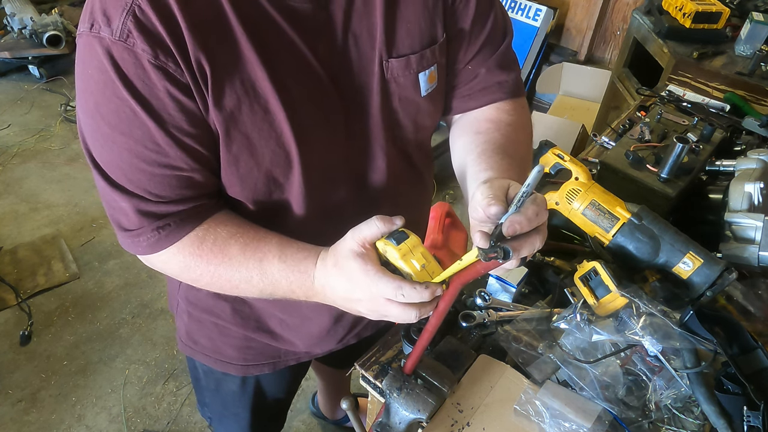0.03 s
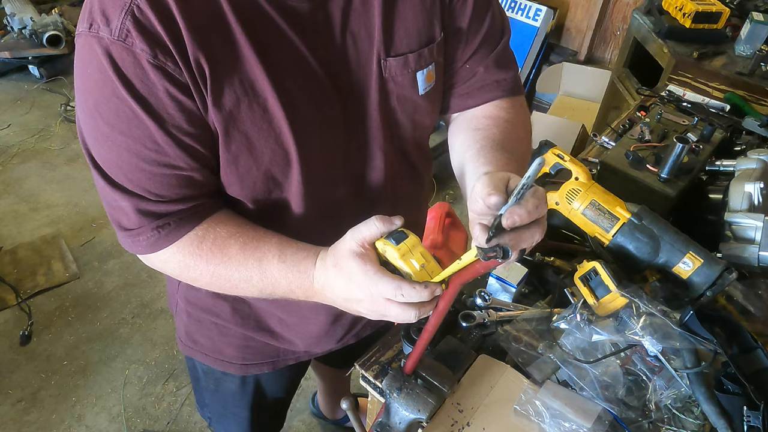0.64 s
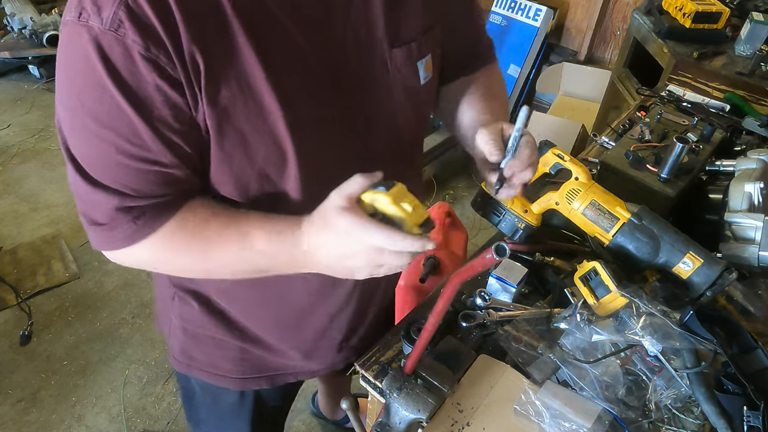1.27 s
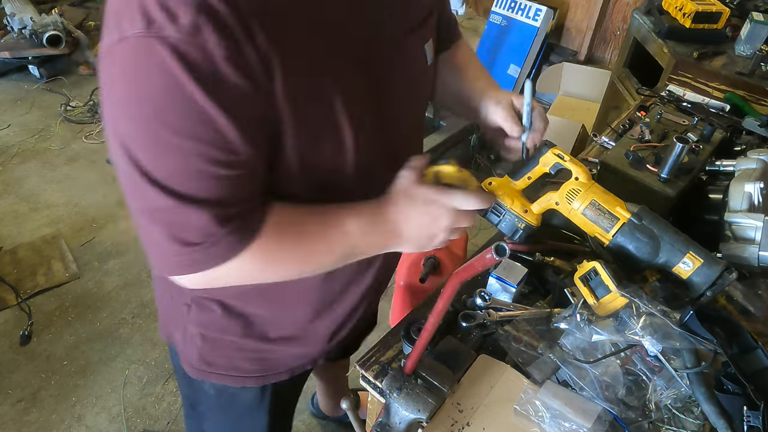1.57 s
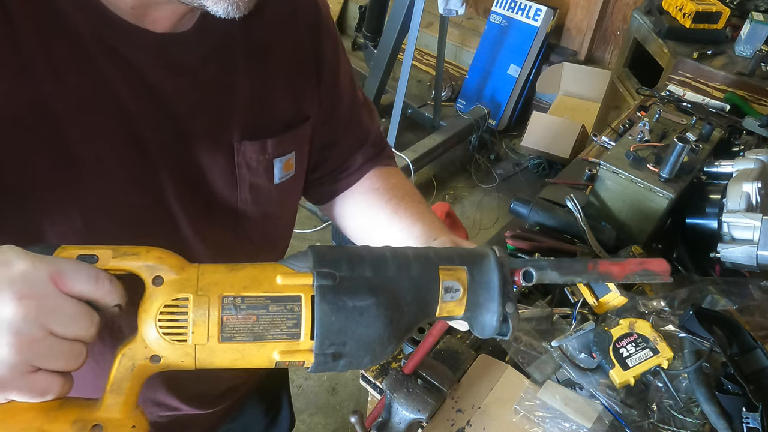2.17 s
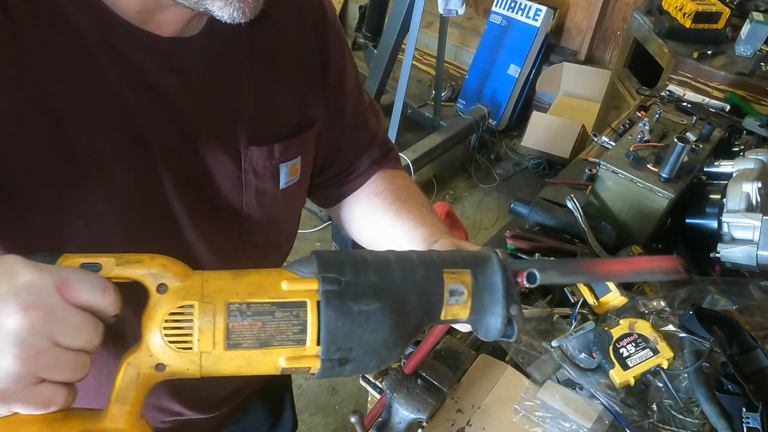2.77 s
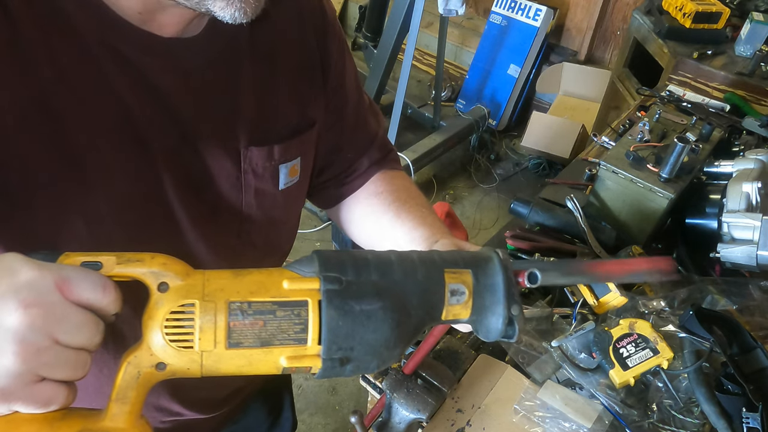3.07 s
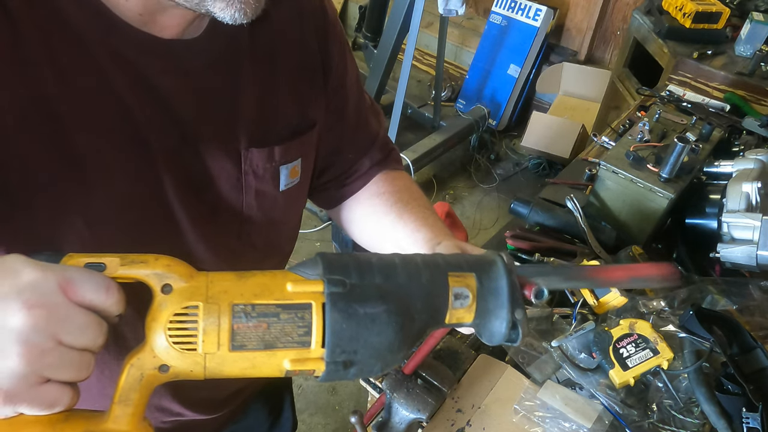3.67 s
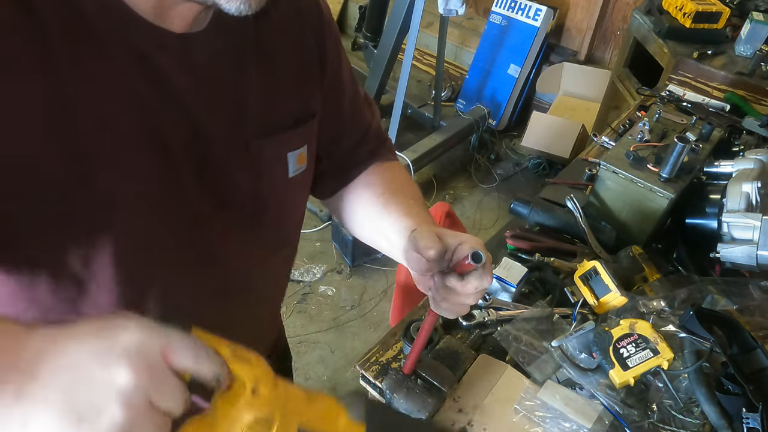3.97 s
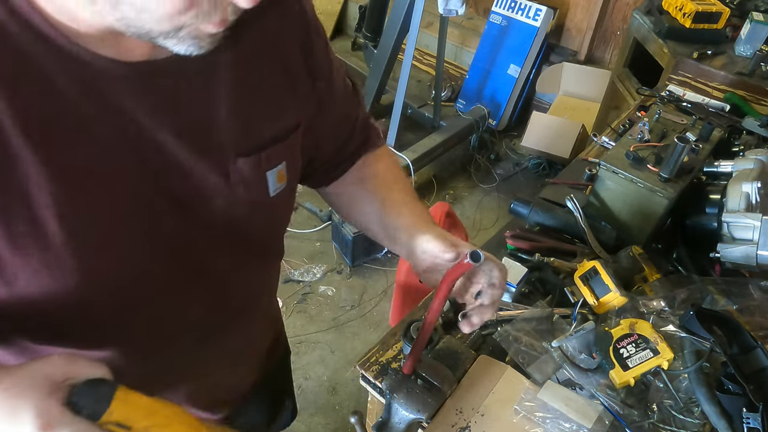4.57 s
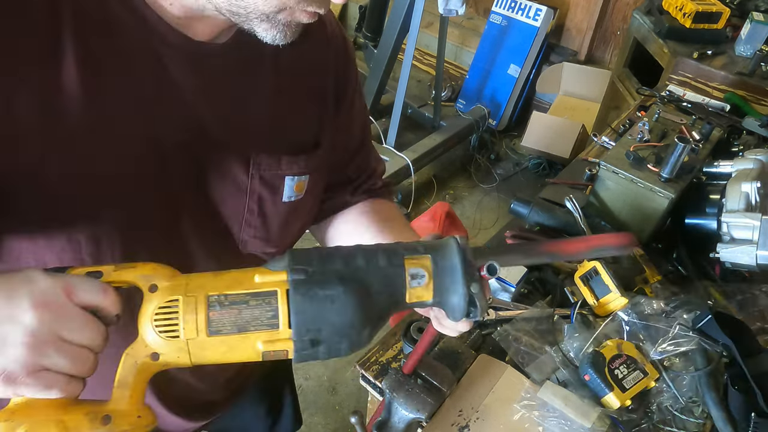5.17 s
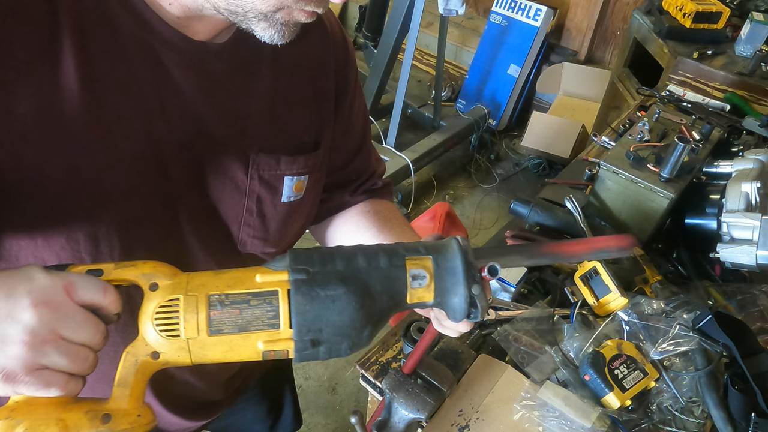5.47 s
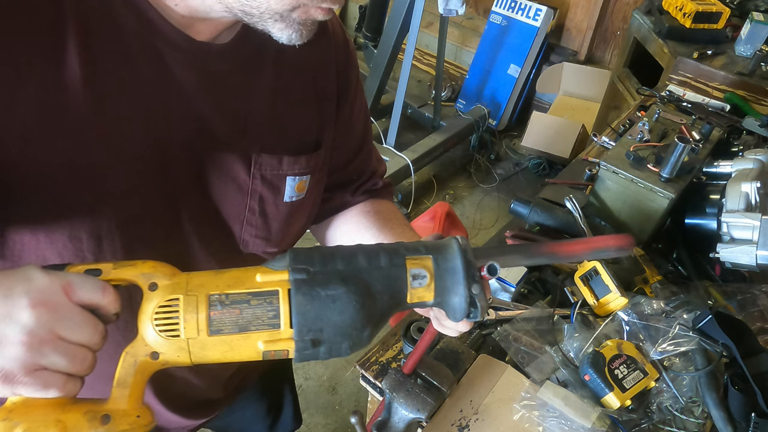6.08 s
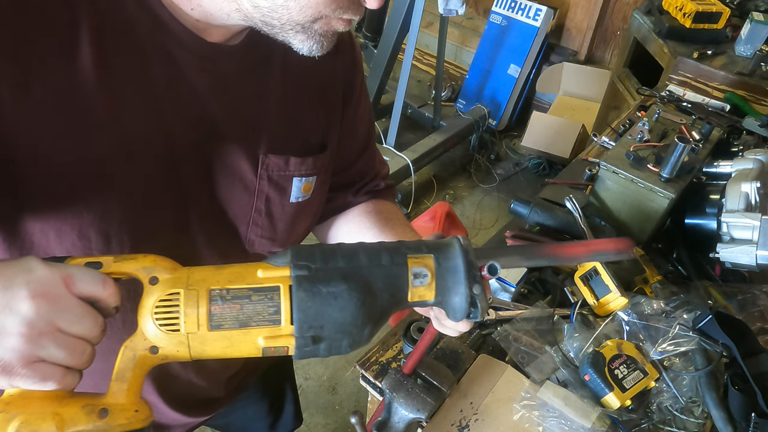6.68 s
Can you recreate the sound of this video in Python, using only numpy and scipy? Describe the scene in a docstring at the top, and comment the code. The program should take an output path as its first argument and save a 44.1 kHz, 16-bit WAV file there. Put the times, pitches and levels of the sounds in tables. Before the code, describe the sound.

A faint low rumble fills a small workshop, with a few light handling ticks. At about 1.2 seconds a steel tape measure zips and chatters into its case, ending in a sharp snap. Dull knocks on a bench follow around 1.7 seconds. At 2.4 seconds a reciprocating saw bites into a steel tube with a tiny squeak and speeds up into a loud, fast, rattling rasp, with a bright hiss, a gear whine and a low shaking hum. Near 4 seconds the blade breaks through and the saw quickly dies away. The tube thuds in the vise, and the offcut clinks and bounces from 4.3 to 4.5 seconds, leaving faint ticks. At about 5.1 seconds a second cut begins abruptly at full speed and runs steadily until the end, near 7 seconds. Everything sounds close, with a short room echo.

```python
"""A tape measure zips shut and is put down on a bench; a reciprocating saw then cuts a steel tube
held in a vise. Each stroke shakes the saw, rattles its drive and drags the teeth over the steel,
while the bevel gear whines. The blade breaks through, the saw dies away and the offcut clinks down.
The scene then jumps into the middle of a second cut. All of it sounds in a small workshop."""
import sys
import numpy as np
from scipy import signal
from scipy.fft import rfft, irfft, next_fast_len
from scipy.io import wavfile
from scipy.ndimage import uniform_filter1d

SR = 44100
rng = np.random.default_rng(int(sys.argv[2]) if len(sys.argv) > 2 else 0)


def transcribe(u):
    """Save the signal u as a 16-bit wav file named by the first command-line argument.

    u: samples, shape (n,) or (channels, n), limited to [-1, 1]; the rate is SR.
    q: integer samples, one column per channel.
    """
    v = np.clip(np.atleast_2d(u).T, -1, 1)
    q = np.round(v * 32767).astype(np.int16)
    wavfile.write(sys.argv[1], SR, q)


N = 305277
T = np.arange(N) / SR
TRIGGER_S, THROUGH_S, JUMP_S = 2.422, 3.959, 5.143  # saw starts, blade breaks through, second cut
FIRST_CUT = T < JUMP_S


def undb(db):
    """Decibels to gain."""
    return np.exp(np.asarray(db) * (np.log(10) / 20))


def unit(x):
    """Scale to rms 1."""
    return x / np.sqrt(np.mean(x ** 2))


def decay(age, t60):
    """Gain that falls 60 dB every t60 seconds."""
    return np.exp(-np.log(1000) * age / t60)


def since(s):
    """Seconds gone by since a moment of the first cut; zero before it and in the second cut."""
    return np.maximum(T - s, 0) * FIRST_CUT


def swell(s, hold, db, rise, fall):
    """Gain that climbs 60 dB per `rise` seconds to its level at s, holds, and drops 60 dB per `fall`."""
    away = np.maximum(s - T, 0) / rise + np.maximum(T - s - hold, 0) / fall
    return undb(db - 60 * np.minimum(away, 3))


def walk(rate):
    """Smooth random drift with about `rate` new values a second; spread near 1."""
    hold = max(int(SR / rate), 32)
    steps = np.repeat(rng.standard_normal(N // 32 + 1)[:N // hold + 1], hold)
    return np.sqrt(2) * uniform_filter1d(uniform_filter1d(steps, hold), hold)[:N]


def across(points, freq):
    """Read (Hz, value) points on a log-frequency axis."""
    hz, value = np.transpose(sorted(map(tuple, points)))
    return np.interp(np.log(np.maximum(freq, 1)), np.log(hz), value)


def body(colour, peaks=(), size=8192):
    """Impulse response of unit energy: a broad colour lifted by resonances."""
    freq = np.arange(size // 2 + 1) * SR / size
    lift_db = sum(lift / (1 + (2 * (freq - hz) / width) ** 2) for hz, width, lift in peaks)
    cepstrum = irfft(np.log(undb(across(colour, freq) + lift_db)))
    cepstrum[1:size // 2] *= 2  # minimum phase keeps attacks sharp
    cepstrum[size // 2 + 1:] = 0
    response = irfft(np.exp(rfft(cepstrum)))
    return response / np.linalg.norm(response)


def ring(force, response):
    """Pass a force through an impulse response."""
    return signal.oaconvolve(force, response)[:N]


def burst(s, db, t60):
    """A blow: a flurry of tiny contacts that dies away."""
    age = np.arange(SR // 3) / SR
    force = undb(db) * rng.standard_normal(len(age)) * decay(age, t60)
    return np.pad(force, (int(s * SR), N))[:N]


def struck(force, colour, modes, ring_db):
    """A struck object: its broad clack and its ringing modes."""
    age = np.arange(SR // 2) / SR
    tones = sum(undb(db) * np.sin(2 * np.pi * hz * age) * decay(age, t60) for hz, db, t60 in modes)
    return ring(force, body(colour)) + undb(ring_db) * ring(force, tones / np.linalg.norm(tones))


def air(start_db=-49, fade_db_per_s=2.5):
    """Low rumble and a faint rush fill the workshop and slowly grow quieter."""
    # room tone: freq_hz, gain_db
    colour = [(15, -35), (25, -5), (101, -4), (257, -24.5), (278, -28.5), (318, -24.5), (373, -35.5),
              (450, -28.5), (501, -35.5), (543, -30), (811, -37.5), (1030, -24.5), (1580, -31), (2020, -48),
              (15000, -73.5)]
    rush = ring(rng.standard_normal(N), body(colour))
    return rush * undb(start_db - fade_db_per_s * T + walk(5.9))


def tape_measure():
    """The steel tape scrapes into its case, chatters and snaps against the stop."""
    # the tape creeps in, runs home, then the case is pushed: start_s, hold_s, level_db, rise_s, fall_s
    slides = [(1.036, 0.03, -51, .3, 0.39), (1.19, .08, -39.5, 0.14, .1), (1.565, 0.022, -48, 0.1, 0.36)]
    # handling ticks, and the tape slapping the mouth of its case: start_s, level_db
    clicks = [(.089, -51.5), (.759, -60), (.851, -60.5), (.885, -54), (1.139, -40.5), (1.185, -24.5),
              (1.198, -26), (1.223, -30), (1.241, -32.5), (1.31, -26.5), (1.572, -36.5), (1.868, -55),
              (1.989, -55), (2.006, -52), (2.123, -58), (2.205, -59.5)]
    # bright zip of the tape: freq_hz, gain_db
    slide_colour = [(400, -25.5), (800, -10.5), (1100, 7.5), (2000, 7.5), (3500, 3.5), (6000, 1),
                    (8000, -0.5), (11000, -15), (15000, -22.5)]
    # the hook hitting its stop: start_s, level_db, t60_s
    snaps = [(1.2722, -20, 0.022), (1.277, -11.5, 0.034)]
    # clack of the case: freq_hz, gain_db
    case_colour = [(59, -43.5), (100, -13), (134, -21), (310, -7), (703, -20), (962, -10.5), (1590, -4.5),
                   (1700, -5), (1880, 1.5), (2320, -10), (3680, -2.5), (5840, -13.5), (7670, -13.5),
                   (11900, -24.5), (15000, -48.5)]
    # ring of the case: pitch_hz, gain_db, t60_s
    case_modes = [(1206, -9, .35), (1850, -3.5, 0.57), (2067, -5, .29), (2616, -7, .1), (3940, -17, 0.054),
                  (6360, -12, .15), (7550, -3.5, 0.181)]
    scrape = sum(swell(*row) for row in slides) * undb(2 * walk(150)) * rng.standard_normal(N)
    ticks = sum(burst(s, db, t60=0.023) for s, db in clicks)
    snap = struck(sum(burst(*row) for row in snaps), case_colour, case_modes, ring_db=-20.5)
    return ring(scrape + ticks, body(slide_colour)) + snap


def sleeve():
    """A sleeve brushes softly as the arm reaches across the bench."""
    # arm movements: start_s, hold_s, level_db
    reaches = [(0.876, 1.3, -77), (2.358, .1, -70.5), (4.6, 0.56, -72)]
    # swish of cloth: freq_hz, gain_db
    colour = [(800, -4.5), (2500, 0), (5000, 1.5), (8000, -2), (12000, -9), (15000, -22)]
    moving = sum(swell(*row, rise=0.4, fall=0.5) for row in reaches)
    return ring(moving * undb(2.5 * walk(170)) * rng.standard_normal(N), body(colour))


def vise():
    """The tube bumps against the jaws, faintly under the tape and hard once it is cut."""
    # bumps: start_s, level_db, t60_s
    bumps = [(0.884, -52, .1), (4.094, -13.5, 0.086), (4.205, -23.5, 0.077), (4.231, -20, 0.037),
             (4.274, -28, 0.076), (4.335, -29, 0.15), (4.42, -31.5, 0.25), (4.495, -30, 0.043),
             (4.529, -34.5, 0.075)]
    # hollow thud: freq_hz, gain_db
    colour = [(30, -17), (70, 3.5), (100, 3), (160, -1), (260, -8), (400, -5), (560, -1.5), (900, -4.5),
              (2000, -17), (4000, -29.5), (10000, -47)]
    return ring(sum(burst(*row) for row in bumps), body(colour))


def bench(sway_hz=39, sway_db=-28, sway_t60=0.74):
    """Tools knock on the bench, softer contacts sounding duller; the first blow sets the top swaying."""
    # tape and saw meeting the bench: start_s, level_db, t60_s, lowpass_hz
    knocks = [(1.640, -20.5, 0.093, 5000), (1.691, -23, 0.15, 2600), (1.716, -31, 0.13, 1400)]
    # thump of the top: freq_hz, gain_db
    colour = [(25, -12.5), (40, -23.5), (60, 9), (100, 8.5), (150, 2), (260, 2), (350, -3.5), (580, 3),
              (900, 3), (1300, 2.5), (2600, -2.5), (3200, -7), (8000, -19.5), (15000, -32)]
    # ring of the top: pitch_hz, gain_db, t60_s
    modes = [(103, -3, 0.4), (184, -12, 0.28), (263.4, -9.5, .25), (600, 0.5, 0.11), (766, -9, .12)]
    force = sum(signal.sosfilt(signal.butter(1, hz, fs=SR, output="sos"), burst(s, db, t60))
                for s, db, t60, hz in knocks)
    age = np.maximum(T - knocks[0][0], 0)
    sway = undb(sway_db) * np.sin(2 * np.pi * sway_hz * age) * decay(age, sway_t60)
    return struck(force, colour, modes, ring_db=-5.5) + sway


def squeak(waver=0.029):
    """The teeth squeal briefly as they slip into and out of the cut."""
    # gliding squeals: start_s, length_s, start_hz, end_hz, level_db
    squeaks = [(2.39, 0.024, 9100, 8680, -67), (2.411, .012, 6220, 4600, -44),
               (2.418, 0.055, 4710, 5100, -38), (3.956, .04, 8500, 8240, -36.5)]
    squeals, wobble = 0, 1 + waver * walk(900)
    for s, length, start_hz, end_hz, db in squeaks:
        hz = wobble * np.interp(T, [s, s + length], [start_hz, end_hz])
        tone = np.sqrt(2) * np.sin(2 * np.pi * np.cumsum(hz) / SR)
        squeals = squeals + tone * swell(s, length, db, rise=0.017, fall=0.03)
    return squeals


def tooth_pressure(angle):
    """The teeth bear down on both half strokes, harder on the pull, and ease off in between."""
    stroke = 1 + 0.14 * np.cos(angle) + 0.14 * np.cos(2 * angle) + 0.12 * np.cos(3 * angle)
    return unit(stroke * undb(0.8 * walk(220)))


def rattle(strokes, size=1024):
    """The loose parts of the drive chatter in the same order on every stroke."""
    pattern = irfft(np.exp(2j * np.pi * rng.random(size // 2 + 1)))
    return unit(np.interp(strokes % 1 * size, np.arange(size + 1), np.append(pattern, pattern[0])))


def rasp(force):
    """Teeth dragging over steel set housing, blade and tube ringing."""
    # broad grind of the cut: freq_hz, gain_db
    colour = [(150, -9), (450, -13), (700, -13), (950, 0), (1500, -3), (2300, -5), (3300, -7), (4300, -8.5),
              (6000, -18.5), (9000, -37)]
    # resonances of housing, blade and tube: centre_hz, width_hz, lift_db
    peaks = [(1111, 157, 10), (1856, 305, 9), (2220, 200, 7.5), (2445, 37, 4), (2843, 97, 5),
             (3080, 100, 5), (3460, 120, 8), (3640, 127, 8.5)]
    return unit(ring(force, body(colour, peaks)))


def hiss(pressure, chatter, graze_s=0.022, fade_db_per_s=205.5):
    """The bright edge of the cut; the teeth graze the steel a moment longer after breaking through."""
    # sizzle of the teeth: freq_hz, gain_db
    colour = [(2500, 2), (4700, 3), (6000, 3), (7200, 1.5), (7800, -2), (8400, 0.5), (9400, -5),
              (11000, -4), (13000, -12), (15500, -58.5)]
    sizzle = unit(ring(pressure * (rng.standard_normal(N) + 0.5 * chatter), body(colour)))
    return sizzle * undb(-31.5 - fade_db_per_s * since(THROUGH_S + graze_s))


def motor(angle):
    """Motor and fan give thin wavering whistles locked to the shaft."""
    # whistles: cycles_per_stroke, gain_db (against the rasp)
    whistles = [(72, -18.5), (92, -16), (121, -22.5), (182, -27), (212, -30), (254, -37)]
    return np.sqrt(2) * sum(undb(db + 2.5 * walk(50)) * np.sin(k * angle + k / 50 * walk(140))
                            for k, db in whistles)


def gear(angle, teeth=47, octave_db=-10):
    """The bevel gear's mesh tone; the crank loads and slows it once a stroke, making sidebands."""
    mesh = teeth * angle + 1.35 * np.sin(angle) + 0.15 * walk(60)
    throb = (1 + 0.7 * np.cos(angle + 1.1)) * undb(1.2 * walk(25))
    return unit(throb * (np.sin(mesh) + undb(octave_db) * np.sin(2 * mesh)))


def housing(angle, cycles_per_stroke=29):
    """The return stroke sets the gear housing buzzing, in turn with the gear's whine."""
    buzz = np.sin(cycles_per_stroke * angle + 0.93 * np.sin(angle) + 1.08 * walk(70))
    throb = 1 - 0.603 * np.cos(angle + 1.9)
    return unit(throb * buzz) * undb(1.2 * walk(40))


def tube(force, biting, load, slow_hz):
    """The tube's free end trembles under load and judders as the saw speeds up and breaks through."""
    # judders: start_s, hold_s, level_db, rise_s, fall_s
    judders = [(2.778, 0.098, -30.5, 1.8, 0.73), (3.995, .03, -22.5, 0.38, 0.42)]
    # low drone of the tube: freq_hz, gain_db
    colour = [(25, -17.5), (70, -3), (140, -5), (300, -12.5), (700, -15), (1200, -50), (3000, -99)]
    # bending resonances of the clamped tube: centre_hz, width_hz, lift_db
    peaks = [(94, 60, 14), (190.4, 46, 5), (244.5, 21.6, 13), (385, 140, 10), (544, 92, 7)]
    tremble = load * undb(-35.5 - 1.2 * slow_hz)
    judder = biting * sum(swell(*row) for row in judders)
    return (tremble + judder) * ring(unit(force), body(colour, peaks))


def crank(angle, slow_hz, sunk_s=3.12, steadying_db_per_s=12):
    """The crank shakes the saw at the stroke rate and knocks in overtones, both weaker at low speed."""
    # partials of the knock: cycles_per_stroke, gain_db
    overtones = [(2, 0.5), (3, -7.5), (4, -1), (5, 1), (6, -8.5), (7, -1.5), (8, -13.5), (9, -8),
                 (10, -4.5), (14, -19), (16, -20), (19, -14.5), (20, -6), (21, -8.5)]
    knock = unit(sum(undb(db + walk(5.4)) * np.sin(k * angle + 2 * np.pi * rng.random())
                     for k, db in overtones))
    knock *= undb(np.where(FIRST_CUT, -34.5, -29.5) - 1.5 * slow_hz)
    shake = np.sqrt(2) * np.sin(angle) * undb(-25.5 - 6 * slow_hz)
    steadied = undb(-steadying_db_per_s * since(sunk_s))  # the kerf grips the blade as it sinks in
    return steadied * (shake + knock)


def saw(second_cut_hz=38.55, bite_s=0.037, catch_s=0.01):
    """One crank drives every part of the saw; returns the cutting noise and the drive's whine and hum."""
    # the trigger is eased in, then squeezed fully, in the first cut: time_s, stroke_hz
    speed = [(2.42, 26.7), (2.784, 33.4), (2.89, 37.2), (3.0, 39.0), (3.3, 40.15), (3.86, 40.8),
             (4.0, 39.8)]
    # the teeth catch or skip for an instant: time_s, change_db
    catches = [(2.578, -0.5), (2.605, -9), (3.93, 2)]
    stroke_hz = np.where(FIRST_CUT, np.interp(T, *np.transpose(speed)), second_cut_hz + 0.08 * walk(3))
    slow_hz = np.maximum(36 - stroke_hz, 0)
    labour = np.clip((38 - stroke_hz) / 6, 0, 1)  # below full speed the motor labours and wavers
    strokes = np.cumsum(stroke_hz * (1 + 0.06 * labour * walk(45))) / SR + 0.0014 * walk(45)
    angle = 2 * np.pi * strokes
    # the load builds as the teeth bite; once they are through, the saw dies away, its whine fastest
    biting = np.where(FIRST_CUT, 1 - np.exp(-since(TRIGGER_S) / bite_s), 1)
    load = biting * undb(-129 * since(THROUGH_S))
    driven = undb(-294 * since(THROUGH_S))
    catch_db = sum(db * np.exp(-((T - s) / catch_s) ** 2) for s, db in catches)

    pressure = tooth_pressure(angle)
    chatter = rattle(strokes)
    grit = rng.standard_normal(N)
    grind = rasp(pressure * (chatter + grit))
    sizzle = np.sqrt(biting) * hiss(pressure, chatter)
    cutting = load * undb(-19.5 + catch_db) * (grind + driven * motor(angle))
    whine_gain = biting * driven * undb(np.where(FIRST_CUT, -27.5, -31.5) - 2.5 * labour)
    whine = whine_gain * (gear(angle) + undb(-6.5) * housing(angle))
    judder = tube(0.5 * chatter + grit, biting, load, slow_hz)
    hum = load * crank(angle, slow_hz)
    return cutting + sizzle + judder + squeak(), whine + hum


def offcut(settle_s=4.63, settle_length_s=0.16, settle_count=4):
    """The cut-off piece brushes the blade, drops and bounces; loose steel settles in faint ticks."""
    # the piece landing and bouncing: start_s, level_db, t60_s
    bounces = [(4.273, -15, 0.031), (4.33, -18, 0.038), (4.358, -14, 0.027), (4.384, -43, 0.091),
               (4.446, -35.5, .05), (4.505, -39, 0.036)]
    # clank of the piece: freq_hz, gain_db
    colour = [(120, -48), (200, -3), (292, -9), (326, -17), (397, 0), (435, -8), (476, -5), (721, -15.5),
              (1150, 0.5), (1380, -1.5), (1810, -1.5), (2800, -5.5), (3230, -3), (5550, -20), (15000, -68)]
    # ring of the piece: pitch_hz, gain_db, t60_s
    modes = [(900, 6, 0.39), (1060, 9.5, 0.36), (1350, 6, 0.26), (1900, -5, .15), (2220, -7, .16),
             (2444, -11, .4), (2697, -11, .27), (3176, -21, .4), (3989, 0, 0.24), (4215, -14, 0.288),
             (4619, -14, .15)]
    # light touches on the blade and loose steel: start_s, level_db, t60_s
    touches = [(4.205, -40.5, 0.042), (4.215, -35, 0.024), (4.245, -55, 0.018), (4.445, -53, 0.12),
               (4.479, -51.5, 0.16), (4.528, -55.5, 0.15), (4.59, -54, 0.079)]
    # thin tick of the blade: freq_hz, gain_db
    blade_colour = [(1000, -5), (3000, -1.5), (7000, -4.5), (9000, -1), (11000, -6), (15000, -30)]
    # ring of the blade: pitch_hz, gain_db, t60_s
    blade_modes = [(8900, 6, .25), (9100, -3, .3), (9750, -3, .25), (11300, -12, 0.23)]
    clinks = struck(sum(burst(*row) for row in bounces), colour, modes, ring_db=-14.5)
    slots = (np.arange(settle_count) + rng.random(settle_count)) / settle_count
    tinkles = sum(burst(*row) for row in touches)
    settling = sum(burst(s, db=-64, t60=0.032) for s in settle_s + settle_length_s * slots)
    return clinks + struck(tinkles + settling, blade_colour, blade_modes, ring_db=-18)


def room(send, build_s=0.0026, width=1.29):
    """The workshop's diffuse tail, different at each ear and shorter in the treble."""
    # reverb time: freq_hz, t60_s
    t60s = [(100, 0.5), (500, 0.5), (2000, 0.42), (5000, 0.28), (10000, 0.24), (16000, 0.2)]
    freq, age, cells = signal.stft(rng.standard_normal((2, SR * 3 // 4)), SR, nperseg=256)
    tails = signal.istft(cells * decay(age, across(t60s, freq)[:, None]), SR)[1]
    tails *= 1 - np.exp(-np.arange(tails.shape[1]) / SR / build_s)
    mid, side = (ring(send, tail / np.linalg.norm(tail)) for tail in tails)
    # long waves reach both sides alike
    side = signal.sosfilt(signal.butter(1, 2500, "high", fs=SR, output="sos"), side)
    return mid + width * np.array([side, -side])


def scene():
    """Every source is heard directly; all but the saw's drive also feed the workshop's tail."""
    cutting, drive = saw()
    # sound, send_db
    sources = [(cutting, -11), (tape_measure(), -10), (bench(), -7), (vise(), -10),
               (offcut(), -5), (sleeve(), -8), (air(), -8)]
    direct = drive + sum(sound for sound, _ in sources)
    return direct + room(sum(undb(db) * sound for sound, db in sources))


def record(dry, top_hz=15200):
    """Two close microphone ports hear slightly different phase and level; the top is cut."""
    # level between the ports: freq_hz, left_minus_right_db
    balance = [(60, 0.5), (110, 1.5), (200, 0.5), (380, 1.5), (700, -0.5), (1290, 0), (2380, 2), (4400, -1),
               (8120, 0), (15000, 1)]
    # phase between the ports: freq_hz, left_lead_rad
    phase = [(30, 0), (250, 0), (780, 0.39), (1290, 0.097), (1550, 0.28), (2580, -0.9), (3190, -0.66),
             (3790, -1.1), (5860, 0.37), (6980, -0.24), (8100, 0.12), (8790, -0.1), (12100, 0.2),
             (12900, 0.1), (15200, -0.0)]
    size = next_fast_len(N + SR, real=True) // 2 * 2
    freq = np.arange(size // 2 + 1) * SR / size
    left = undb(across(balance, freq) / 2) * np.exp(0.5j * across(phase, freq))
    ports = irfft(rfft(dry, size) * np.array([left, 1 / left]), size)[:, :N]
    return signal.sosfilt(signal.ellip(8, 0.2, 70, top_hz, fs=SR, output="sos"), ports)


dry = scene()
out = record(dry)
transcribe(out)
```